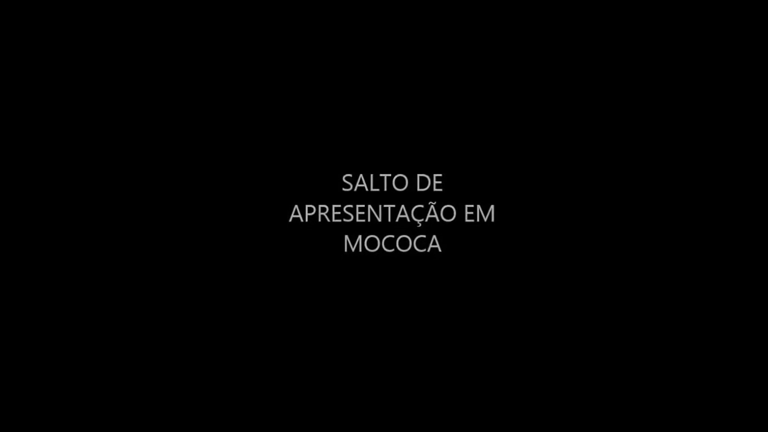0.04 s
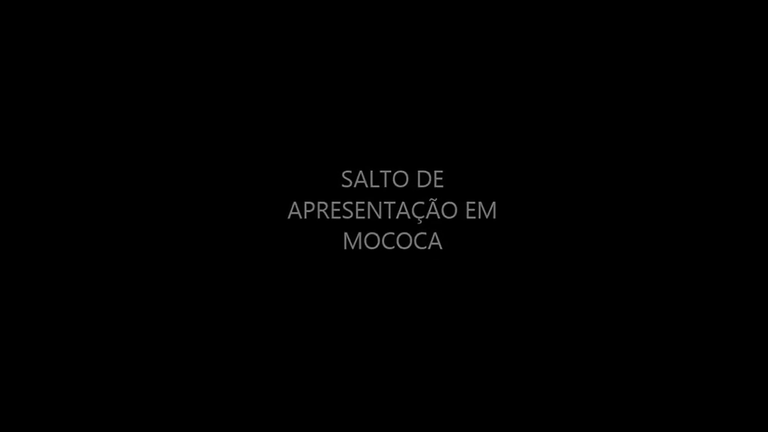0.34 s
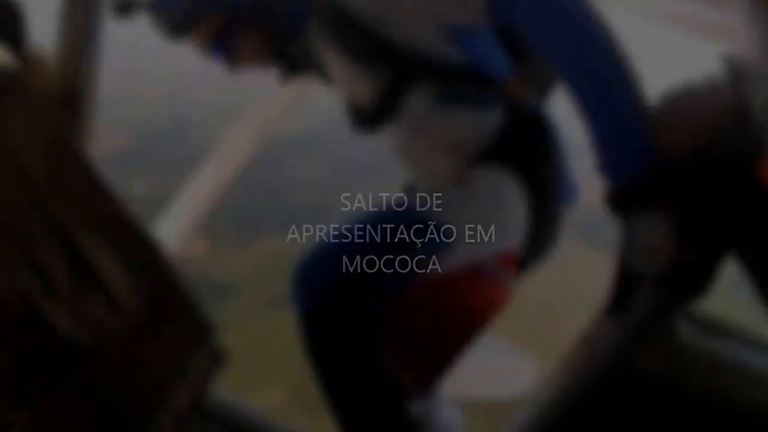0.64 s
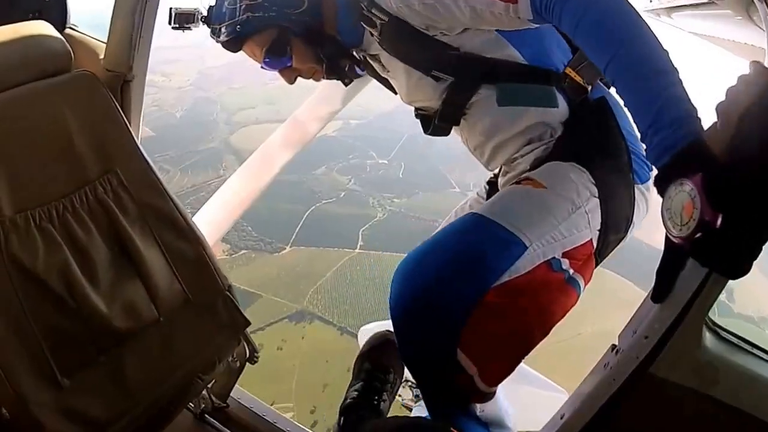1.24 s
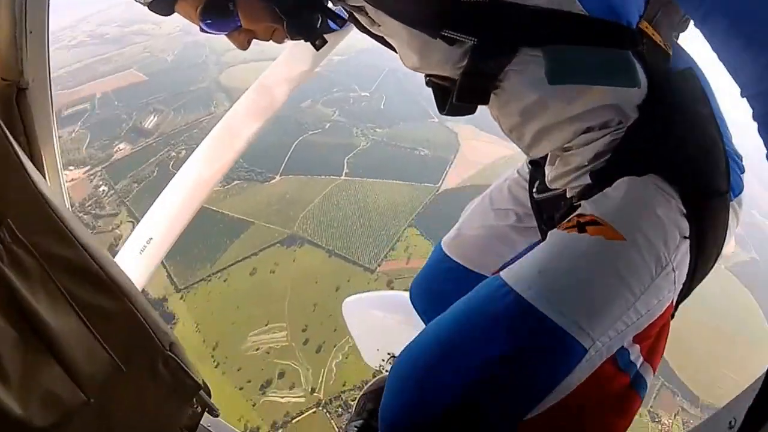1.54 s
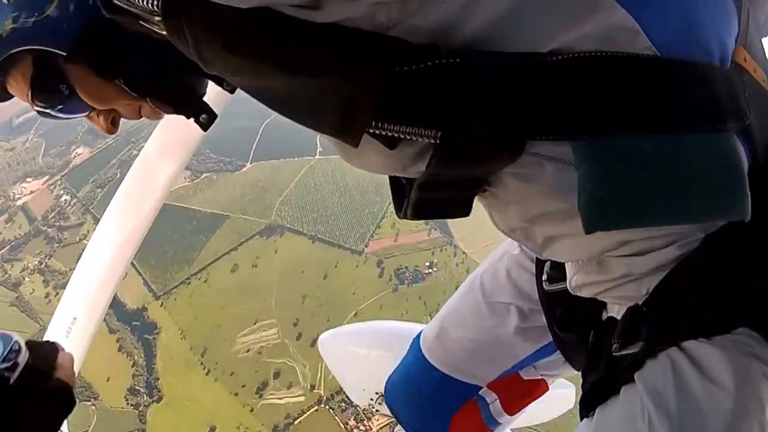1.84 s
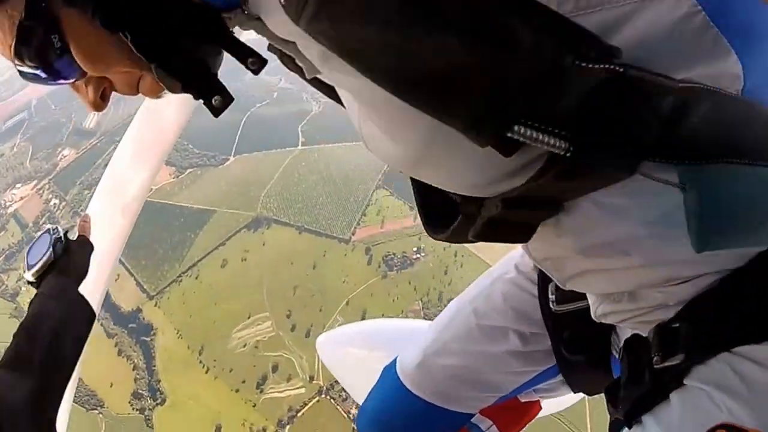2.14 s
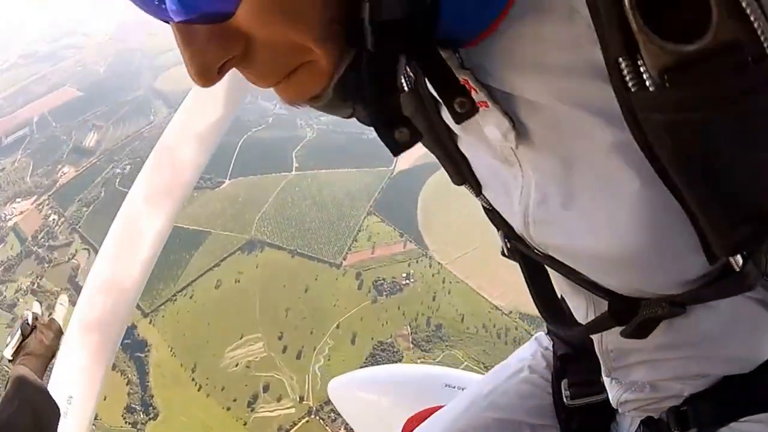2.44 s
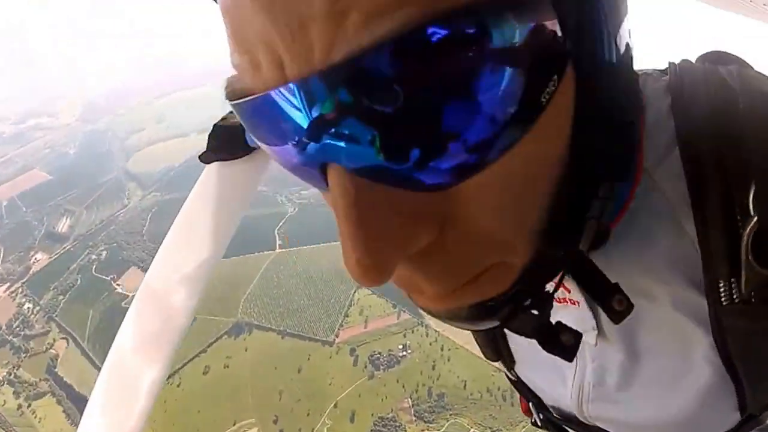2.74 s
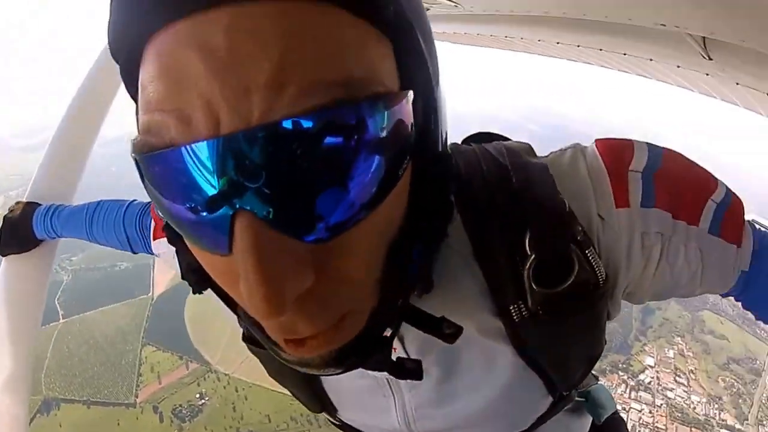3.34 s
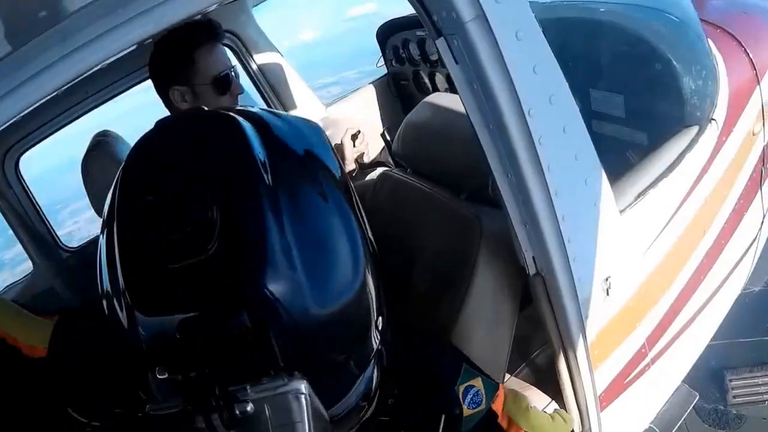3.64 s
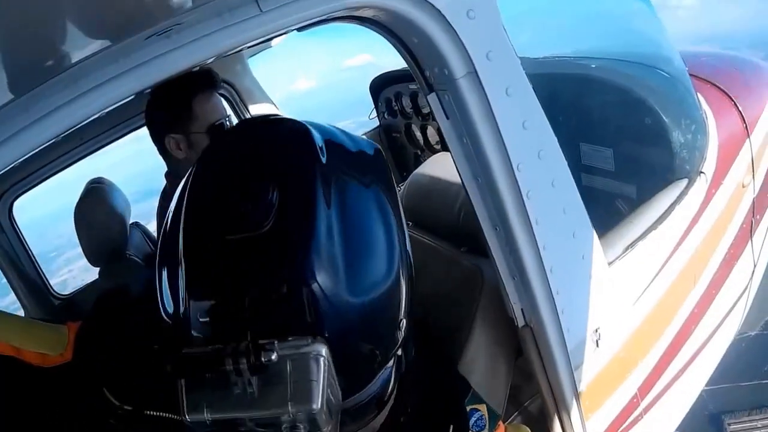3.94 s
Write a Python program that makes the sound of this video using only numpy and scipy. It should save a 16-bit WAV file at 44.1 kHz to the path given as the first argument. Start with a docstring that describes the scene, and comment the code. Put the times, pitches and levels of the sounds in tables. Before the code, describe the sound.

Wind roars and buffets the microphone at a small plane's open door, then blasts harshly.

```python
"""Skydiver at the open door

A skydiver climbs out of a small plane in flight: wind roars and buffets the microphone, the doorway
throbs, and the hiss, pulsed by the propeller, fills out in the slipstream. After a brief silence
a microphone outside the cabin takes the full blast and overloads into a harsh rasp."""
import sys
import numpy as np
from scipy import signal
from scipy.fft import rfft, irfft, next_fast_len
from scipy.io import wavfile
from scipy.ndimage import map_coordinates

SR = 44100
rng = np.random.default_rng(int(sys.argv[2]) if len(sys.argv) > 2 else 0)


def int16_out(signal):
    """Quantize to a 16-bit WAV file."""
    q = np.round(np.clip(np.atleast_2d(signal).T, -1, 1) * 32767)
    wavfile.write(sys.argv[1], SR, q.astype(np.int16))


N = 176400

# Fader rides for the layers of wind at the door (time [s], level [dB])
RUMBLE_RIDE = [(0, -29), (.45, -29.5), (.55, -22), (1.1, -29), (1.9, -22), (2.25, -22), (2.45, -41),
               (3.5, -35)]
BUFFET_RIDE = [(0, -35), (.15, -27.5), (.5, -26), (.8, -20), (1.2, -17.5), (1.3, -21), (1.55, -16.5),
               (1.82, -17), (1.9, -20), (2.5, -20), (2.72, -30), (3.25, -24.5), (3.51, -26)]
ROAR_RIDE = [(0.0, -38.5), (0.35, -27), (0.48, -31.5), (0.55, -26), (1.15, -21), (1.28, -24), (1.42, -20),
             (1.46, -30.5), (1.49, -22), (1.69, -25), (1.73, -36), (1.86, -16.5), (1.91, -21.5),
             (3.51, -22)]
HISS_RIDE = [(0.0, -44.5), (0.38, -36.5), (0.4, -40.5), (0.56, -32), (0.91, -28.5), (1.04, -26),
             (1.26, -30.5), (1.53, -27), (1.69, -33), (1.71, -41.5), (1.99, -28), (2.55, -29),
             (2.58, -30.5), (2.71, -25), (3.21, -23), (3.51, -26)]
SIZZLE_RIDE = [(0, -61), (1.55, -63), (1.75, -47), (1.85, -41), (2.0, -46), (2.55, -44), (2.75, -58),
               (3.5, -62)]
WHISTLE_RIDE = [(0.4, -63), (.7, -35.5), (1.0, -39), (1.2, -46), (1.6, -57), (1.8, -73)]
# Tone of the buffeting, the roar, and the hiss in and out of shelter (frequency [Hz], gain [dB])
BUFFET_EQ = [(12, -28), (30, -23), (55, -6), (90, 1), (140, -3.5), (220, -8.5), (400, -28), (900, -72)]
ROAR_EQ = [(60, -25), (130, -2.5), (190, 1), (330, -0.5), (500, -5.5), (630, -4.5), (750, -11), (830, -16),
           (1000, -20.5), (1300, -33), (3000, -66)]
SHELTERED_EQ = [(400, 0), (900, -9.5), (1250, -10.5), (1600, -6.5), (2150, -0.5), (3050, -1), (3500, -6),
                (3950, -6.5), (4400, -12), (5000, -15.5), (6000, -26), (6900, -19), (8100, -13),
                (9100, -10.5), (9900, -13.5), (10750, -26), (11400, -14), (12650, -16.5), (13300, -35),
                (14200, -12), (15100, -19)]
SLIPSTREAM_EQ = [(400, -11.5), (900, -1.5), (1900, 1), (2900, -2), (3450, -6.5), (3900, -3.5), (4400, -15),
                 (5000, -18.5), (6000, -32), (6800, -23.5), (7500, -19.5), (8100, -11), (8600, -13),
                 (9800, -12), (11100, -20), (11500, -19.5), (13000, -21), (13900, -16), (15100, -15)]
# Sharp slaps of air on the microphone (time [s], decay [s], level [dB])
AIR_SLAPS = [(0.412, 0.0052, -35.5), (1.785, .008, -31), (1.821, 0.005, -22.5), (2.467, .005, -23)]
# Resonating air pockets (start [s], end [s], pitch [Hz], width [Hz], level [dB])
AIR_POCKETS = [(1.067, 1.444, 39.7, 3.3, -16.5), (1.588, 1.737, 40.5, 3.8, -11.5),
               (1.708, 1.83, 68, 25, -13.5), (1.769, 1.95, 277, 135, -18.5), (2.14, 2.648, 177.4, 65, -16)]
# Howling resonances of the blast outside (pitch [Hz], width [Hz], level [dB])
HOWL_RESONANCES = [(413, 87, -4.5), (608, 119, 1), (780, 590, -10.5)]
# Rides for the blast: buffeting against howl, distorted treble, output (time [s], level [dB])
BLAST_BUFFET_RIDE = [(3.58, 3.5), (3.63, 4.5), (3.68, -3.5), (3.8, -10.5), (3.9, -7), (4.0, -6)]
BLAST_TREBLE_RIDE = [(3.58, -2.5), (3.62, -11), (3.66, -1.5), (3.72, -0.5), (3.8, 1), (3.95, -0.5),
                     (4.0, -3)]
BLAST_OUTPUT_RIDE = [(3.58, -8.5), (3.7, -9.5), (3.82, -11), (4.0, -12.5)]
# Tone of the blast's buffeting, its hiss and the outside microphone (frequency [Hz], gain [dB])
BLAST_BUFFET_EQ = [(20, -10), (70, 5), (200, 2.5), (330, -2), (900, -36)]
BLAST_HISS_EQ = [(500, -6), (1500, -8.5), (3500, -2), (8000, -24), (15000, -49)]
OUTSIDE_MIC_EQ = [(30, 2.5), (2000, -0.5), (6000, -5.5), (10000, -11), (15000, -18)]

STEP_OUT_S, STEP_TAKES_S = 1.81, 0.058  # from the doorway into the slipstream
DOOR_END_S, BLAST_START_S = 3.516, 3.5815


def amp(db):
    """Decibels to linear gain."""
    return 10 ** (np.asarray(db) / 20)


def unit(x):
    """Scale to rms 1."""
    return x / np.sqrt(np.mean(x ** 2) + 1e-20)


def clock():
    """The time of each sample in seconds."""
    return np.arange(N) / SR


def fader(ride):
    """Gain per sample from (time [s], level [dB]) points."""
    return amp(np.interp(clock(), *np.transpose(ride)))


def ramp(centre_s, length_s):
    """A fade from 0 to 1, centred on a moment."""
    return np.clip((clock() - centre_s) / length_s + .5, 0, 1)


def wobble(rate):
    """A smooth random curve with `rate` knots a second."""
    knots = rng.standard_normal(int(N * rate / SR) + 4)
    return map_coordinates(knots, [clock() * rate])


def filtered(x, response):
    """Shape x with a gain given as a function of frequency."""
    size = next_fast_len(N + SR // 2)
    hz = np.fft.rfftfreq(size, 1 / SR)
    return irfft(rfft(x, size) * response(hz), size)[:N]


def equalised(x, eq):
    """Shape x with (frequency [Hz], gain [dB]) points joined on a log frequency axis."""
    f, db = np.transpose(eq)
    return filtered(x, lambda hz: amp(np.interp(np.log(hz + 1), np.log(f + 1), db)))


def rush(eq):
    """Rushing air: equalised noise at rms 1."""
    return unit(equalised(rng.standard_normal(N), eq))


def resonance(hz, width_hz):
    """Turbulence ringing in one resonance, at rms 1."""
    def peak(f):
        detuning = (f * f - hz * hz) / ((f + 1) * width_hz * 1.69)
        return 1 / (1 + detuning ** 2)
    return unit(filtered(rng.standard_normal(N), peak))


def rumble():
    """Deep rumble in the doorway."""
    return fader(RUMBLE_RIDE) * resonance(hz=44, width_hz=27)


def buffet(lumps_db=1.75, trim_db=0.27):
    """Wind pummels the microphone in bassy lumps."""
    lumps = rush(BUFFET_EQ) * amp(lumps_db * wobble(30))
    return fader(BUFFET_RIDE) * amp(trim_db) * unit(lumps)


def roar(doorway_db=-9, flutter_db=1.38, trim_db=2):
    """Broad turbulence, with the doorway's hollow ring until the microphone leaves it."""
    inside = np.sqrt(1 - ramp(STEP_OUT_S, STEP_TAKES_S))
    air = rush(ROAR_EQ) + amp(doorway_db) * inside * resonance(hz=659, width_hz=126)
    flutter = amp(flutter_db * wobble(70))
    return fader(ROAR_RIDE) * amp(trim_db) * unit(air * flutter)


def hiss(flutter_db=1.0, trim_db=0.85):
    """Hiss flutters with fast turbulence and fills out as the microphone enters the slipstream."""
    outside = ramp(STEP_OUT_S, STEP_TAKES_S)
    air = np.sqrt(1 - outside) * rush(SHELTERED_EQ) + np.sqrt(outside) * rush(SLIPSTREAM_EQ)
    flutter = amp(flutter_db * wobble(260))
    return fader(HISS_RIDE) * amp(trim_db) * unit(air * flutter)


def sizzle():
    """A thin sizzle on top, strongest around the step out."""
    return fader(SIZZLE_RIDE) * resonance(hz=11900, width_hz=900)


def whistle():
    """Air whistles faintly over an edge of the doorway."""
    return fader(WHISTLE_RIDE) * resonance(hz=879, width_hz=7.9)


def slaps():
    """Bursts of slipstream hit the microphone with an instant attack and a fast decay."""
    t = clock()
    bursts = sum(amp(db) * (t >= start) * np.exp(-((t - start) / decay) ** 2)
                 for start, decay, db in AIR_SLAPS)
    return bursts * rush(SLIPSTREAM_EQ)


def throbs(steadiness=0.26, fade_s=0.07):
    """Air pockets swing at their own pitch while the flow catches them."""
    out = np.zeros(N)
    for start, end, hz, width_hz, db in AIR_POCKETS:
        swing = resonance(hz, width_hz)
        envelope = np.abs(signal.hilbert(swing))
        compressed = unit(swing / envelope ** steadiness)
        out += amp(db) * compressed * ramp(start, fade_s) * (1 - ramp(end, fade_s))
    return out


def door_wind(gust_db=1.07, shaft_hz=39.4, propeller_depth=0.074):
    """Gusts sway the wind bed, the propeller pulses all but its lows; slaps and throbs sit on top."""
    gusts = amp(gust_db * .5 * wobble(14))
    propeller = 1 + propeller_depth * np.sin(2 * np.pi * shaft_hz * clock() + .5 * wobble(4))
    lows = rumble() + buffet()
    accents = throbs() + slaps()
    airflow = roar() + hiss() + sizzle() + whistle()
    return accents + gusts * (lows + propeller * airflow)


def overload(x, hardness):
    """Saturation at plus and minus 1; more hardness gives a sharper knee."""
    return x / (1 + np.abs(x) ** hardness) ** (1 / hardness)


def door_microphone(wind, ceiling=0.48, top_hz=15350):
    """Only the largest swings of the wind overload the microphone at the door."""
    rounded = ceiling * overload(wind / ceiling, hardness=6.6)
    return filtered(rounded, lambda hz: hz < top_hz)


def blast(hiss_db=-21):
    """The full wind outside: a resonant howl with low buffeting and a little hiss."""
    howl = unit(sum(amp(db) * resonance(hz, width_hz) for hz, width_hz, db in HOWL_RESONANCES))
    buffeting = fader(BLAST_BUFFET_RIDE) * rush(BLAST_BUFFET_EQ)
    return howl + buffeting + amp(hiss_db) * rush(BLAST_HISS_EQ)


def outside_microphone(wind, drive_db=38, rustle_db=-28, crossover_hz=3700, flutter_db=3):
    """Wind slams the microphone from limit to limit, almost a square wave; the treble flutters."""
    square = overload(amp(drive_db) * wind, hardness=4)
    rasp = square + amp(rustle_db) * rush(BLAST_HISS_EQ)
    body = filtered(rasp, lambda hz: 1 / (1 + (hz / crossover_hz) ** 4))
    treble = (rasp - body) * fader(BLAST_TREBLE_RIDE) * amp(flutter_db * wobble(280))
    return fader(BLAST_OUTPUT_RIDE) * equalised(body + treble, OUTSIDE_MIC_EQ)


def scene(tail_db=-28, tail_s=0.014):
    """The door wind drops out with a tiny tail; a brief silence, then the blast hits."""
    since_end = np.maximum(clock() - DOOR_END_S, 0)
    tail = amp(tail_db) * np.exp(-since_end / tail_s)
    fade_out = np.maximum(1 - ramp(DOOR_END_S, length_s=0.0039), tail)
    door = door_microphone(door_wind()) * fade_out
    outside = outside_microphone(blast()) * ramp(BLAST_START_S, length_s=0.00024)
    return (door + outside)[None]


def record(dry):
    """A brick-wall low-pass takes the very top off the mix."""
    return filtered(dry[0], lambda hz: hz < 15800)[None]


dry = scene()
out = record(dry)
int16_out(out)
```